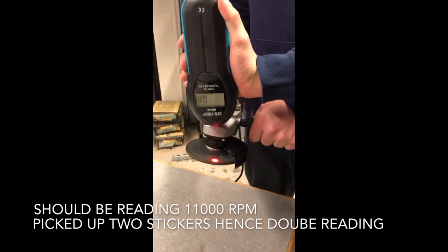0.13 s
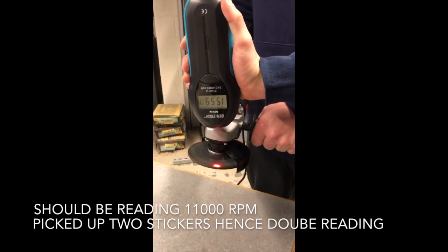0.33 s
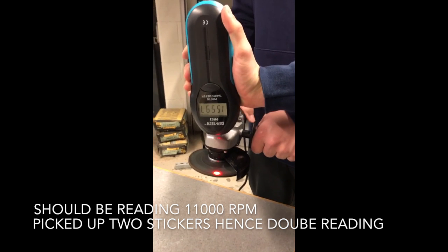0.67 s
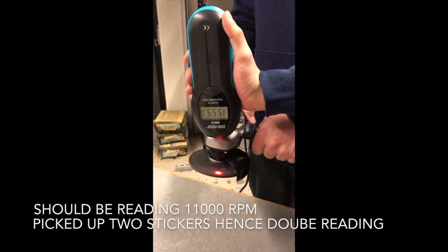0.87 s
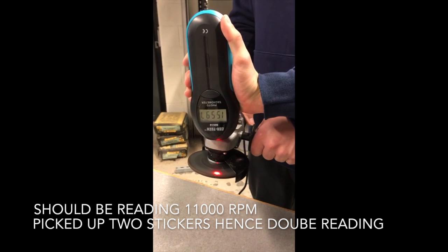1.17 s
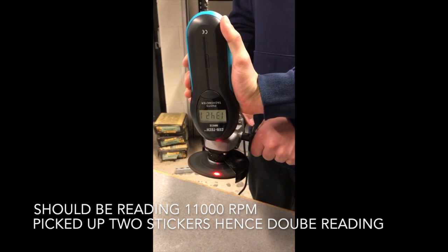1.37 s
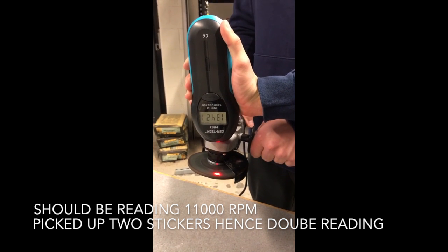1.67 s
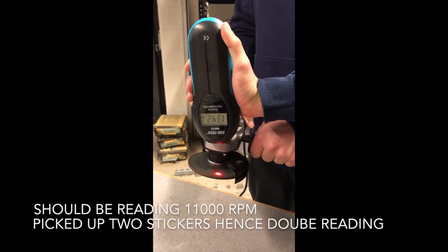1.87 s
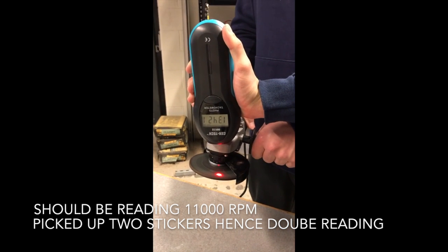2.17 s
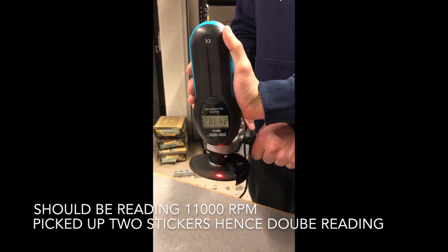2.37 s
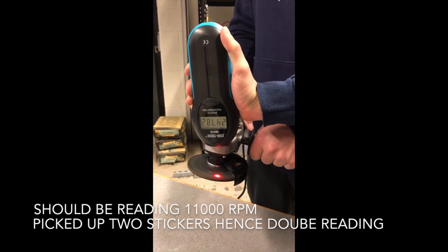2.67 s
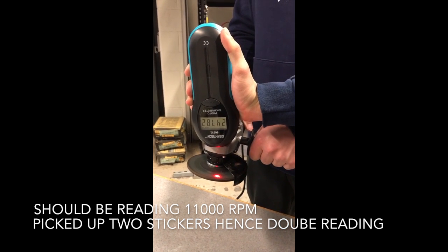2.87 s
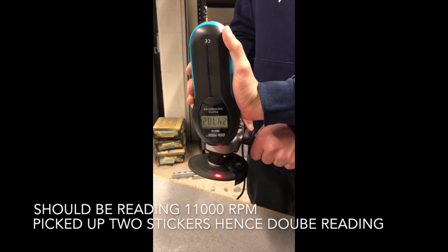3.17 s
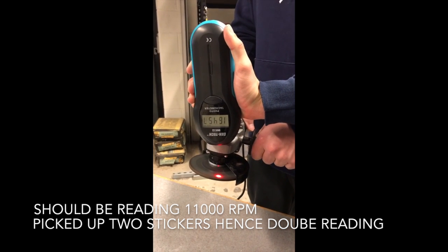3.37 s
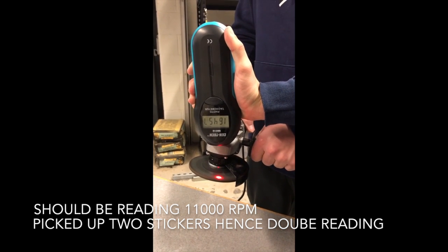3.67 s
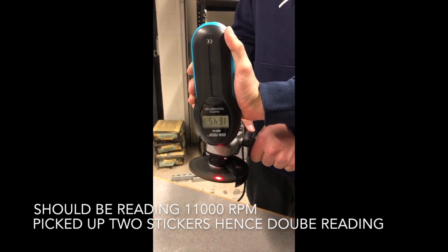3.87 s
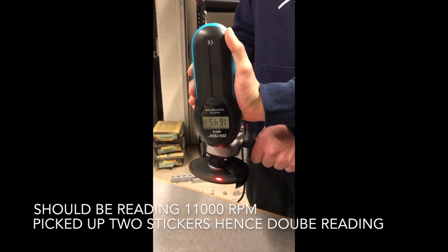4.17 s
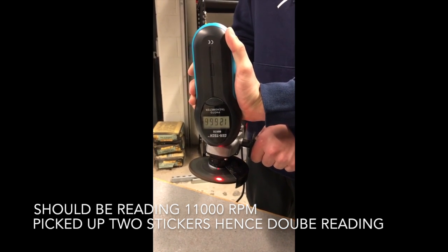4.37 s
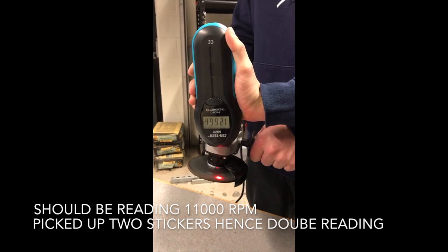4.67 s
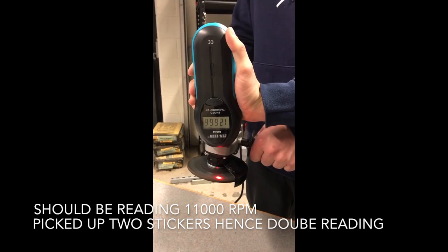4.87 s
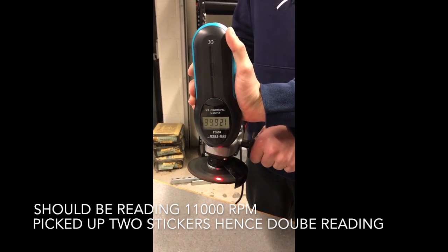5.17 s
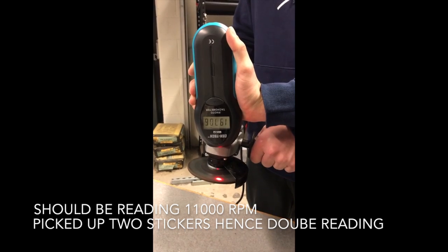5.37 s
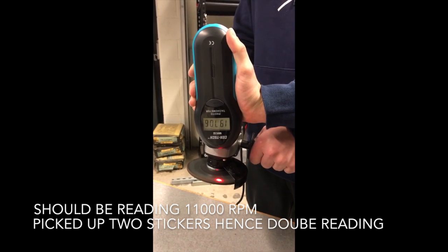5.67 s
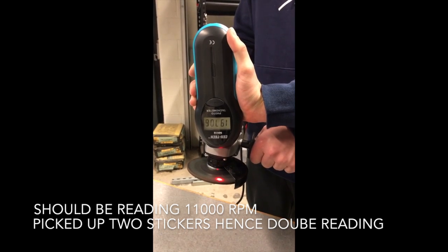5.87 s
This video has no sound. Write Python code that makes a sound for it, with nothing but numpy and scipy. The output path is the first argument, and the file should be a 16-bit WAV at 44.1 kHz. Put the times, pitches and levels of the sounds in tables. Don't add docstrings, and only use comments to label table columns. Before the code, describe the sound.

A hand-held angle grinder, heard close in a small workshop, completes its wind-up during the first second or two, its harsh gear hiss and tooth whine fading. It then holds full speed: rushing vent air, bright metallic chatter and a steady motor hum. Sharp little gear knocks scatter irregularly throughout, some in quick runs. Low room hum and a few soft bench bumps lie underneath, captured by a phone with slight saturation.

```python
import sys
import numpy as np
from scipy import signal
from scipy.fft import rfft, irfft
from scipy.io import wavfile
from scipy.ndimage import uniform_filter1d

SR = 44100
rng = np.random.default_rng(int(sys.argv[2]) if len(sys.argv) > 2 else 0)


def to_wav(s):
    ch = np.atleast_2d(s).T
    pcm = np.round(np.clip(ch, -1, 1) * 32767)
    wavfile.write(sys.argv[1], SR, pcm.astype(np.int16))


def decibels_to_gain(level_db):
    exponent = np.asarray(level_db, float) / 20
    return 10 ** exponent


N = 265349

FULL_SPEED_HZ = 548
PINION_TEETH, CROWN_TEETH = 12, 37

# centre in Hz, width in Hz, rms level in dB.
BENCH_MODES = [(59.6, 22, -50.5), (80.7, 3.6, -60), (153, 24, -57.5)]
# centre in seconds, extra level in dB.
LEANS = [
    (.08, 9),
    (.45, 2),
    (1.6, 7),
    (2.8, 7),
    (3.7, 7),
    (4.1, 5),
    (4.9, 6),
    (5.55, 5),
    (5.9, 10),
]
# centre in seconds, pitch in Hz, peak in dB, length in seconds.
BUMPS = [
    (3.345, 150, -42, 0.023),
    (5.56, 240, -39, 0.021),
    (5.71, 590, -40, .03),
    (5.78, 592, -45, .03),
    (5.833, 276, -45, 0.032),
    (5.94, 247, -45, .025),
]
# lack in Hz, time constant in seconds.
SHORTFALL = [(103.2, .814), (4.2, .14)]
# order in cycles per disc turn, relative level in dB.
DISC_ORDERS = [(5, 0), (6, -8), (7, -6), (8, -14), (9, -7)]
# frequency in Hz, level in dB.
ROTOR_BODY = [(446, -40), (456, -41), (467, -47.5), (474, -39.5), (490, -36.5), (506, -39), (530, -49),
              (545, -45.8)]
# frequency in Hz, level in dB.
THIRD_BODY = [(1330, -47), (1362, -40), (1385, -36.5), (1465, -35), (1490, -41), (1525, -52), (1580, -54)]
# centre in Hz, width in Hz, level in dB.
STRAIN_MODES = [(4500, 900, 0), (5700, 700, -3), (9650, 350, -7)]
# centre in seconds, peak in dB, treble share in dB.
KNOCKS = [(0.3051, -17, -13), (0.4013, -18, -12), (0.4718, -17, -14), (0.5026, -19, -22), (0.558, -19, -10),
          (0.8338, -14, -15), (0.8627, -16, -15), (1.0129, -8, -13), (1.2489, -17, -13), (1.3541, -18, -9),
          (1.4468, -19, -11), (2.096, -14, -14), (2.426, -14, -4), (2.5001, -18, -1), (2.5673, -17, -2),
          (3.5029, -17, -8), (3.7171, -17, -12), (3.785, -18, -5), (4.002, -16, -7), (4.1272, -16, -11),
          (4.2514, -19, -7), (4.2946, -19, -13), (4.4309, -15, -11), (4.812, -16, -8), (4.9312, -18, -9),
          (4.9922, -16, -3), (5.3839, -19, -13), (5.5178, -16, -15), (5.592, -17, -8), (5.7589, -17, -14)]
# first blow in seconds, disc turns between blows, number of blows, peak in dB.
RUNS = [(.62, 4, 2, -15), (.7488, 4, 3, -17), (.9535, 5, 2, -14), (1.048, 6, 2, -16), (1.6555, 5, 3, -19),
        (1.782, 5, 3, -20), (1.8848, 5, 2, -16), (1.9995, 6, 3, -20), (2.2327, 5, 2, -19),
        (2.33, 7, 2, -18.5), (2.601, 7, 2, -14), (2.7085, 6, 2, -16), (2.9007, 6, 2, -15),
        (3.1089, 7, 7, -16.5), (3.3905, 7, 3, -18), (3.5827, 7, 2, -14.5), (3.8235, 7, 2, -15),
        (3.9068, 8, 2, -15.5), (4.3183, 6, 3, -18), (4.4588, 6, 2, -16), (4.5368, 7, 2, -17),
        (4.6665, 7, 2, -19), (5.8203, 7, 3, -20)]
# centre in Hz, width in Hz, level in dB.
KNOCK_MODES = [(6230, 520, 2), (4700, 1200, -7), (7600, 1300, -7.5), (9500, 1300, -7), (11200, 1500, -14),
               (13300, 4000, -5)]
# frequency in Hz, density in dB per Hz.
METAL_SPECTRUM = [(2000, -14), (3400, 2.5), (4200, -8.5), (5600, -3.5), (7200, -7), (9000, -2.5),
                  (10000, -3.5), (10500, -19), (11700, -7.5), (12650, -1.5), (13500, -4.5), (15800, -6)]
# centre in Hz, width in Hz, level in dB.
CASE_MODES = [(5383, 11, 8.5), (6145, 370, 1.5), (7050, 30, -6), (7580, 40, -3.5), (9410, 240, -2),
              (12110, 83, 1)]
# centre in Hz, width in Hz, level in dB.
GUARD_MODES = [(4650, 380, -1), (5070, 330, -2)]
# frequency in Hz, density in dB per Hz.
AIR_SPECTRUM = [(40, -38), (100, -40), (300, -17), (460, -24.5), (700, -16.5), (1100, -2.5), (1600, -5.5),
                (2500, -4), (3400, -7), (5000, -8), (9000, -17)]
# centre in Hz, width in Hz, level in dB.
VENT_MODES = [(1220, 190, -11), (1780, 270, -16.5), (2220, 340, 0.5), (2225, 47, -6), (2550, 480, -7),
              (3290, 610, -11)]


def level(x, db):
    return x * decibels_to_gain(db) / np.sqrt(np.mean(x ** 2))


def ring(x, hz, width):
    return signal.lfilter(*signal.iirpeak(hz, hz / width, fs=SR), x)


def ring_twice(x, hz, width):
    return ring(ring(x, hz, width), hz, width)


def colour(x, spectrum, modes):
    hz, db = np.transpose(spectrum)
    log_hz = np.log(np.arange(1, N // 2 + 2) * SR / N)
    broad = irfft(rfft(x) * decibels_to_gain(np.interp(log_hz, np.log(hz), db)), N)
    return broad + sum(decibels_to_gain(db) * ring(x, centre, width) for centre, width, db in modes)


def walk(rate):
    hold = int(SR / rate)
    steps = np.repeat(rng.standard_normal(N // hold + 1), hold)
    smooth = uniform_filter1d(uniform_filter1d(steps, hold), hold)[:N]
    return smooth / np.std(smooth)


def tone(turns, order, db, flutter_db, slip):
    strength = np.sqrt(2) * decibels_to_gain(db + flutter_db * walk(14))
    return strength * np.sin(2 * np.pi * order * turns + slip * walk(9))


def hum():
    t = np.arange(N) / SR
    out = sum(level(ring(rng.standard_normal(N), hz, width), db) for hz, width, db in BENCH_MODES)
    upper_db = -50.5 - 0.6 * t + walk(5.22)
    lean_s = 0.2
    lower_db = -55.5 + sum(db * np.exp(-((t - s) / lean_s) ** 2) for s, db in LEANS)
    out += tone(t * 220.2, order=1, db=upper_db, flutter_db=0.7, slip=0.25)
    return out + tone(t * 80.8, order=1, db=lower_db, flutter_db=2.5, slip=1.2)


def bumps():
    t = np.arange(N) / SR
    out = np.zeros(N)
    for s, hz, db, length in BUMPS:
        out += decibels_to_gain(db) * np.exp(-((t - s) / length) ** 2) * np.sin(2 * np.pi * hz * t)
    return out


def room(x):
    t60_s, tail_db = 0.2, -17
    t = np.arange(int(0.4 * SR)) / SR
    tail = rng.standard_normal(len(t)) * np.exp(-np.log(1000) * t / t60_s)
    tail *= t > 0.004
    return x + decibels_to_gain(tail_db) * signal.fftconvolve(x, tail / np.sqrt(np.sum(tail ** 2)))[:N]


def shafts(rotor, disc, hz):
    t = np.arange(N) / SR
    rotor_db = np.interp(hz, *np.transpose(ROTOR_BODY))
    third_db = np.interp(3 * hz, *np.transpose(THIRD_BODY))
    disc_db = -40.7 + 40 * np.log2(hz / FULL_SPEED_HZ)
    mesh_db = -38 - 8.7 * t / 0.6
    out = tone(rotor, order=1, db=rotor_db, flutter_db=0.8, slip=0.2)
    out += tone(rotor, order=2, db=third_db - 9, flutter_db=1.5, slip=0.7)
    out += tone(rotor, order=3, db=third_db - 0.5, flutter_db=1.5, slip=0.3)
    out += tone(rotor, order=PINION_TEETH, db=mesh_db, flutter_db=2.5, slip=0.5)
    out += tone(disc, order=1, db=-60, flutter_db=1.5, slip=0.2)
    out += tone(disc, order=3, db=-52, flutter_db=0.8, slip=0.2)
    out += tone(disc, order=4, db=-51.5, flutter_db=1, slip=0.2)
    for order, db in DISC_ORDERS:
        out += tone(disc, order=order, db=disc_db + db, flutter_db=0.2, slip=0.073)
    return out


def strain():
    fade_s = 0.45
    rub = rng.standard_normal(N) * decibels_to_gain(1.3 * walk(205))
    hiss = sum(decibels_to_gain(db) * ring_twice(rub, hz, 1.5 * width) for hz, width, db in STRAIN_MODES)
    return level(hiss, -29) * np.exp(-(np.arange(N) / SR / fade_s) ** 2)


def blows(disc):
    t = np.arange(N) / SR
    faint_count, faint_db = 24, -18.5
    rebound_share, rebound_db = 0.3, -6
    run = []
    for start, turns, count, db in RUNS:
        first_turn = np.interp(start, t, disc)
        run += [(first_turn + turns * k, db) for k in range(count)]
    run_turn, run_db = np.transpose(run)
    s = np.r_[np.interp(run_turn, disc, t), rng.uniform(0.3, N / SR, faint_count)]
    chance = rng.standard_normal((2, len(s)))
    peak_db = np.r_[run_db, np.full(faint_count, faint_db)] + 1.2 * chance[0]
    treble_db = -13 + 2.5 * chance[1]
    first = np.c_[np.transpose(KNOCKS), [s, peak_db, treble_db]]
    s, peak_db, treble_db = first[:, rng.random(first.shape[1]) < rebound_share]
    again = np.interp(np.interp(s, t, disc) + 1, disc, t)
    return np.c_[first, [again, peak_db + rebound_db, treble_db]]


def knocks(disc):
    s, peak_db, treble_db = blows(disc)
    span = np.arange(320)
    at = np.clip((s * SR).astype(int)[:, None] + span - 150, 0, N - 1)
    out = np.zeros(N)
    for hz, width, db in KNOCK_MODES:
        low = hz < 8000
        spread = 55 if low else 90
        flurry = rng.standard_normal((len(s), len(span))) * np.exp(-((span - 130) / spread) ** 2)
        blow = ring_twice(flurry, hz, 1.65 * width)
        blow_db = db - 1 + peak_db + (0 if low else treble_db + 8.5)
        blow *= (decibels_to_gain(blow_db) / np.abs(blow).max(axis=1))[:, None]
        np.add.at(out, at, blow)
    return out


def gears(disc, case_db, guard_db):
    once_a_turn = 1 + 0.24 * np.cos(2 * np.pi * disc) + 0.052 * np.cos(4 * np.pi * disc)
    slack_db = 0.23 * walk(70) + 1.6 * walk(250)
    teeth = rng.standard_normal(N) * decibels_to_gain(slack_db + 0.92 * walk(120))
    treble = rng.standard_normal(N) * decibels_to_gain(slack_db + 0.92 * walk(120))
    teeth = signal.sosfilt(signal.butter(6, 10600, "low", fs=SR, output="sos"), teeth * once_a_turn)
    treble = signal.sosfilt(signal.butter(6, 10600, "high", fs=SR, output="sos"), treble)
    case = colour(teeth + treble, METAL_SPECTRUM, CASE_MODES)
    guard = sum(decibels_to_gain(db) * ring_twice(teeth, hz, 1.5 * width) for hz, width, db in GUARD_MODES)
    return level(case, 0) * decibels_to_gain(case_db) + level(guard, 0) * decibels_to_gain(guard_db)


def fan(db):
    air = rng.standard_normal(N) * decibels_to_gain(0.3 * walk(12))
    return level(colour(air, AIR_SPECTRUM, VENT_MODES), 0) * decibels_to_gain(db)


def scene():
    t = np.arange(N) / SR
    creep = 0.48
    hz = FULL_SPEED_HZ + creep * t - sum(lack * np.exp(-t / fade) for lack, fade in SHORTFALL)
    rotor = np.cumsum(hz) / SR
    disc = rotor * PINION_TEETH / CROWN_TEETH
    air_db = -22 + 0.6 * np.exp(-t / 0.41)
    case_db = -25.5 + 1.7 * np.exp(-t / 0.98)
    guard_db = -36.5 + 4 * np.exp(-t / 1.9)
    noisy = fan(air_db) + gears(disc, case_db, guard_db) + knocks(disc) + strain()
    return (room(noisy) + shafts(rotor, disc, hz) + hum() + bumps())[None]


def low_pass(x):
    return signal.sosfilt(signal.butter(12, 16360, fs=SR, output="sos"), x)


def record(dry):
    x = signal.sosfilt(signal.butter(3, 47, "high", fs=SR, output="sos"), dry)
    x = np.tanh(1.3 * x) / 1.22
    x = signal.sosfilt(signal.ellip(16, 0.3, 100, 15730, fs=SR, output="sos"), x)
    return low_pass(x)


dry = scene()
out = record(dry)
to_wav(out)
```